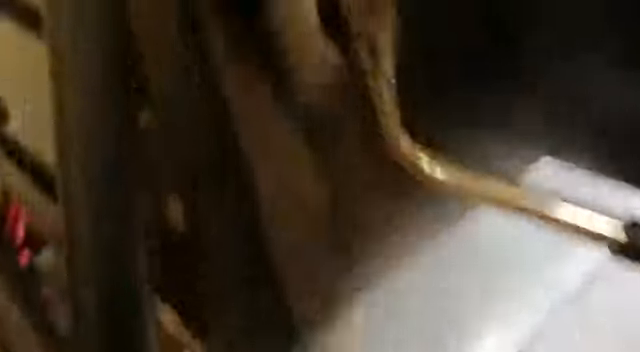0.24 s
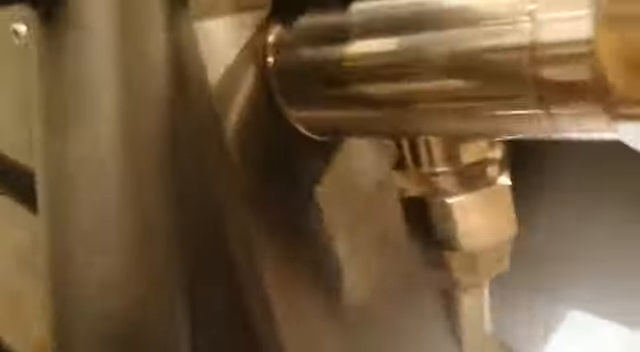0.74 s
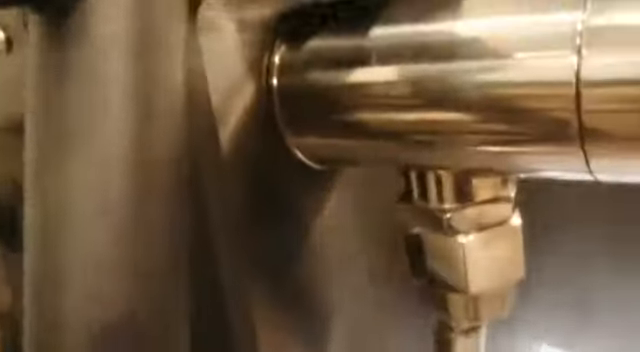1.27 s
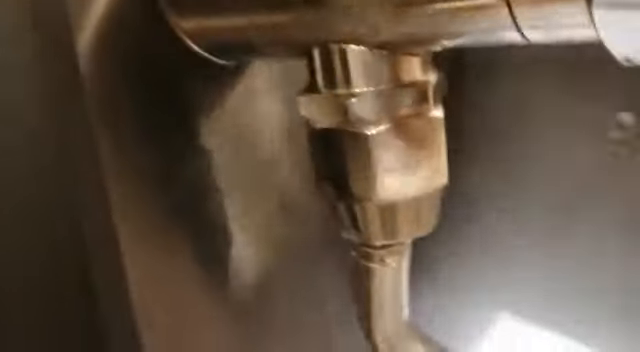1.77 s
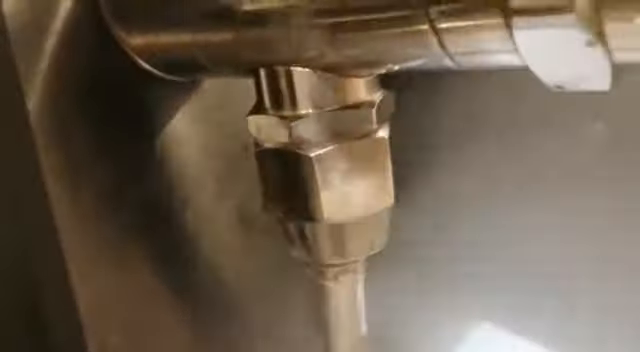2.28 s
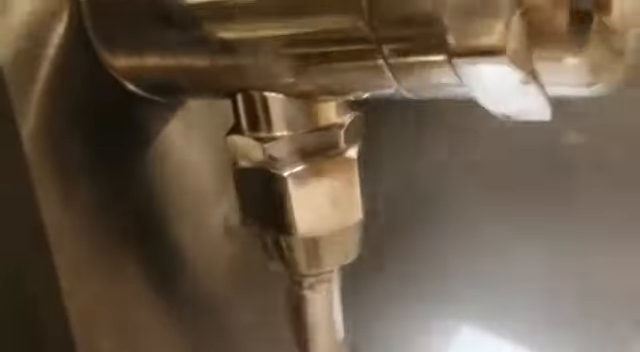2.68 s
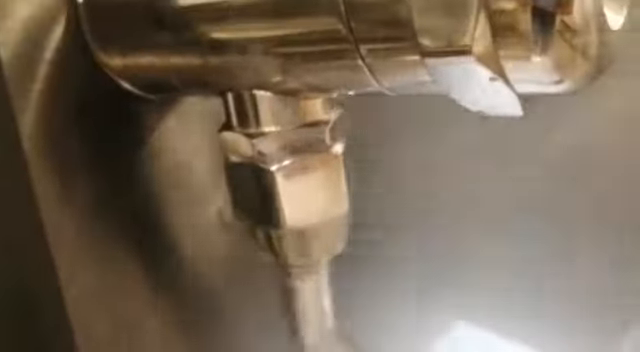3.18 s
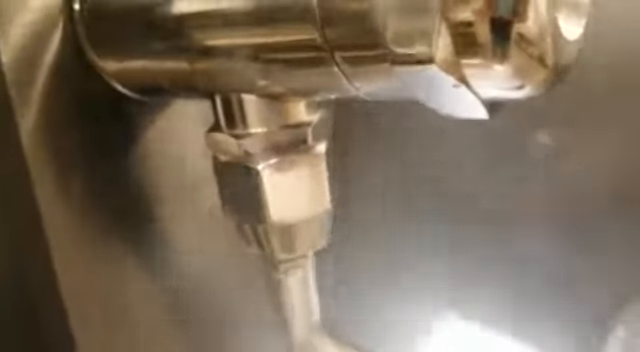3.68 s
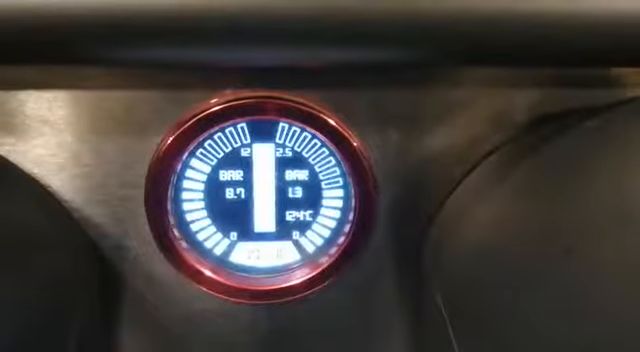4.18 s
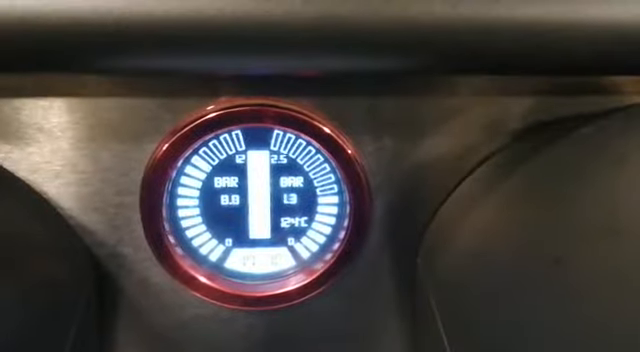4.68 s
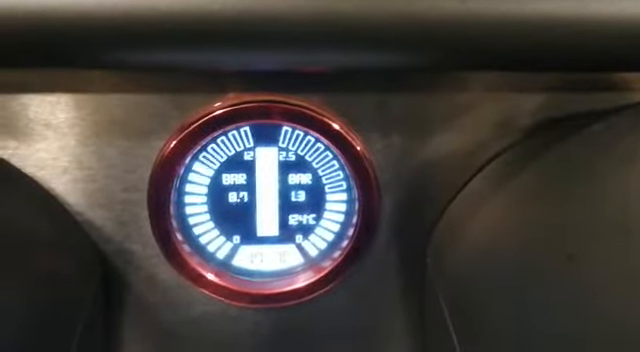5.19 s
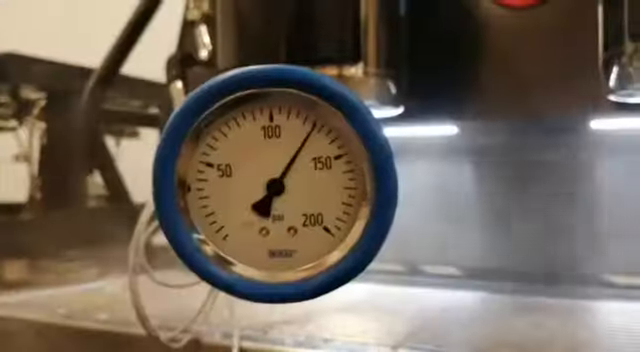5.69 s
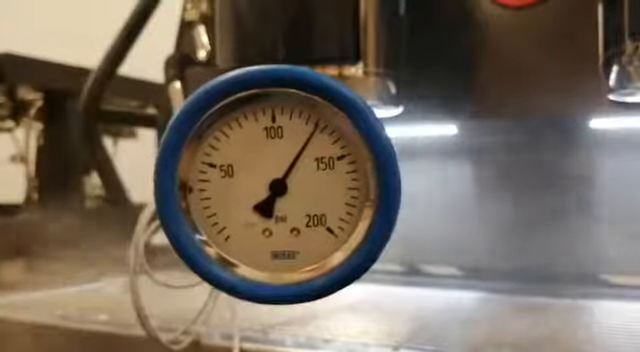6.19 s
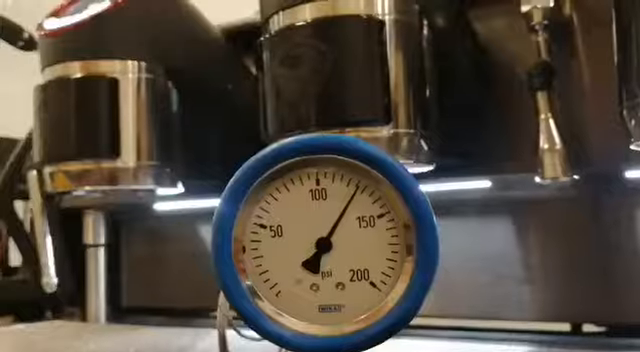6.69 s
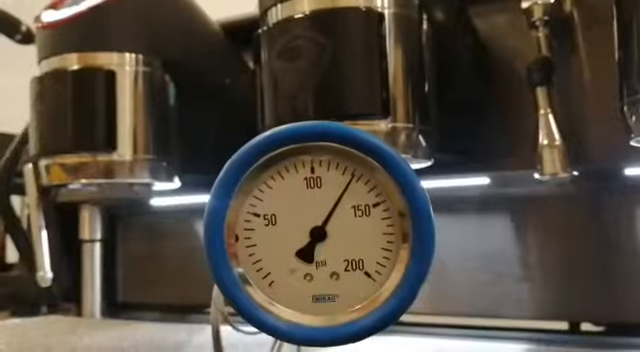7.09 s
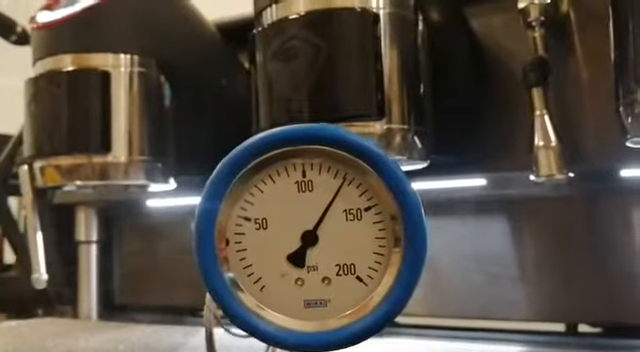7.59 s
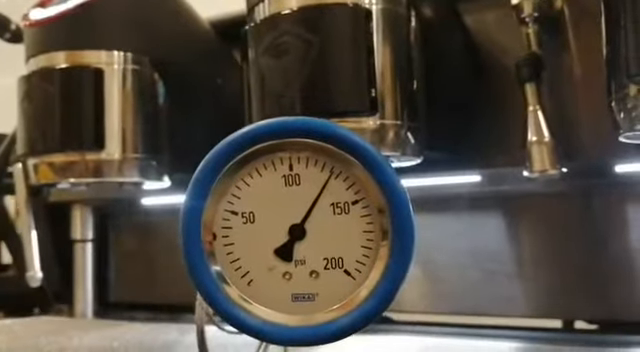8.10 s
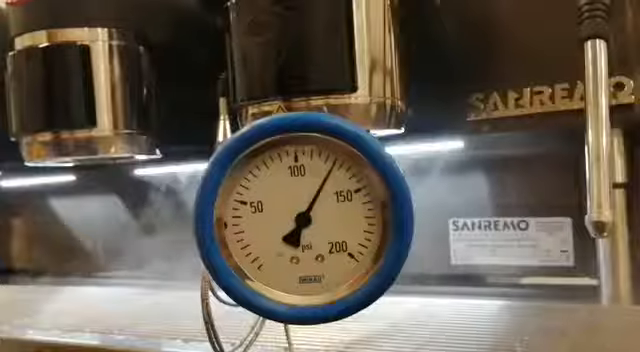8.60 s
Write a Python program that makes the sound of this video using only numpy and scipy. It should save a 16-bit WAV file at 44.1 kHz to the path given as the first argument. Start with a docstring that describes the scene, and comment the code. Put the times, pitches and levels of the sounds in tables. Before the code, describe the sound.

A close, bright hiss from an espresso machine's steam wand starts at once, swirling and spitting tiny droplets. It is loud at first, settles over the next couple of seconds and swells slightly around 3.5 seconds. At 3.9 seconds the perspective jumps: the hiss comes in quick, uneven spurts, and the pump's low hum and rumble join in. At 5.2 seconds the hiss steadies with a new tone, and at 6.4 it sounds a step farther away, gradually dulling. Soft, low bumps occur near the start and around 4, 5 and 7 seconds. Cups, saucers and a spoon clatter three times, at about 7, 7.6 and 8.1 seconds, toward the right across a hard, echoing room. At about 8.4 seconds everything drops out for an instant, then the closer hiss and hum return until the end.

```python
"""Steam hisses from the wand of an espresso machine: a swirling jet that spits tiny droplets.
We hear it at the wand, then at the control panel (where the hiss spurts and the pump's hum joins in),
then by the pressure gauge and a step back from it. Soft, low bumps come now and then.
Late on, cups, saucers and a spoon clatter three times across a hard, echoing room.
Near the end all sound drops out for a moment."""
import sys
import numpy as np
from scipy import signal
from scipy.fft import rfft, irfft, next_fast_len
from scipy.io import wavfile
from scipy.ndimage import uniform_filter1d

SR = 44100
rng = np.random.default_rng(int(sys.argv[2]) if len(sys.argv) > 2 else 0)


def log_audio(samples):
    """Write samples as a 16-bit WAV file to the path given in sys.argv[1]."""
    # one column per channel
    frames = np.atleast_2d(samples).T
    # limit to full scale, then quantise
    limited = np.clip(frames, -1, 1)
    pcm = np.round(limited * 32767).astype(np.int16)
    wavfile.write(sys.argv[1], SR, pcm)


N = 390285
TIME = np.arange(N) / SR
AT_PANEL_S, AT_GAUGE_S, STEP_BACK_S = 3.926, 5.174, 6.42  # the listener jumps to a new place
DROP_OUT_S, RETURN_S, PAST_END_S = 8.359, 8.479, 10
PANEL_RIGHT_DB, PANEL_FALL_DB_PER_S = -1.1, 6  # the hiss at the panel: starting offset and fade


def amp(db):
    """Turns decibels into a number to multiply a sound by."""
    return 10 ** (np.asarray(db) / 20)


def evened(x):
    """Scales a signal so that its typical size (rms) is one."""
    return x / np.sqrt(np.mean(x ** 2) + 1e-20)


def at_pitch(table, hz):
    """Looks up each column of a table at the given frequencies."""
    row_hz, *columns = np.transpose(table)
    return np.array([np.interp(np.log(hz + 1), np.log(row_hz + 1), c) for c in columns])


def at_time(table, t):
    """Looks up a two-column table at the given times."""
    return np.interp(t, *np.transpose(table))


def between(start, end, edge_s=0.002):
    """One from start to end and zero outside, joined by ramps."""
    return np.clip(np.minimum(TIME - start, end - TIME) / edge_s + .5, 0, 1)


def eased(t, at_s, span_s):
    """A smooth step from zero to one."""
    return .5 + .5 * np.tanh((t - at_s) / (2 * span_s))


def bell(x, centre, width, db):
    """A lift in dB at the centre, falling away on both sides."""
    return db * np.exp(-((x - centre) / width) ** 2)


def wander(per_s):
    """A random drift of typical size one, with per_s new values a second."""
    times = np.arange(0, PAST_END_S, 1 / per_s)
    return evened(np.interp(TIME, times, rng.standard_normal(4000)[:len(times)]))


def add(mix, start_s, sound):
    """Adds a sound to the mix at the given time."""
    part = mix[max(round(start_s * SR), 0):][:len(sound)]
    part += sound[:len(part)]


def coloured(x, spectrum):
    """Turns frequencies up or down, following rows of pitch_hz, gain_db."""
    size = next_fast_len(x.shape[-1] + 4096)
    gain = amp(at_pitch(spectrum, np.fft.rfftfreq(size, 1 / SR))[0])
    return irfft(rfft(x, size) * gain, size)[..., :x.shape[-1]]


def noise_pair(likeness, size=N):
    """White noise for two ears: unrelated at likeness 0, the same at 1."""
    left, other = rng.standard_normal((2, size)) * np.sqrt(SR / 2)
    return np.array([left, likeness * left + np.sqrt(1 - likeness ** 2) * other])


def jet(start, end, colour, change, likeness, patchy_db, flicker_db):
    """Rushing steam: noise shaped by colour and change(t, hz), with swirls lifting random patches."""
    first, last = max(int(start * SR) - 1024, 0), min(int(end * SR) + 1024, N)
    hz, t, slices = signal.stft(noise_pair(likeness, last - first), SR, nperseg=512, noverlap=384)
    t, hz = t + first / SR, hz[:, None]
    level_db = at_pitch(colour, hz) + change(t - start, hz)
    swirls = uniform_filter1d(rng.standard_normal(slices.shape[1:]), size=4, axis=0)
    swirls = uniform_filter1d(swirls, size=12, axis=1)
    flicker = uniform_filter1d(rng.standard_normal(len(t)), size=4)
    level_db += patchy_db * evened(swirls) + flicker_db * evened(flicker)
    slices = slices * amp(level_db) * hz ** 2 / (hz ** 2 + 230 ** 2)  # a small jet makes little bass
    hiss = np.zeros((2, N))
    hiss[:, first:last] = signal.istft(slices, nperseg=512, noverlap=384)[1][:, :last - first]
    return hiss * between(start, end)


def near_echoes(x, echo_db, count=14):
    """Quick echoes off the machine and counter put fine ripples in the tone of the hiss."""
    echoes = np.zeros((2, SR // 50))
    delays = rng.integers(SR // 400, echoes.shape[1], (2, count))
    strengths = rng.choice([-1., 1.], delays.shape) * amp(echo_db) / np.sqrt(count)
    np.put_along_axis(echoes, delays, strengths, axis=1)
    echoes[:, 0] = 1  # the direct sound
    return signal.oaconvolve(x, echoes / np.linalg.norm(echoes[0]), axes=1)[:, :N]


def steel_echo_db(t, hz):
    """An echo off the steel beside the wand strengthens some pitches and weakens others."""
    # how late the echo comes: time_s, lag_ms
    echo_lag = [(0.05, .295), (.18, .225), (.26, .255), (.42, .45), (.57, .505), (.68, .395), (.92, .305)]
    lag_s = at_time(echo_lag, t) / 1000
    nearness = np.exp(-abs(t - .28) / .6)  # closest to the steel at 0.28 s
    echo = .7 * nearness
    ripple = abs(1 + echo * np.exp(2j * np.pi * hz * lag_s)) / np.sqrt(1 + echo ** 2)
    return 20 * np.log10(ripple) + nearness * bell(hz, centre=9160, width=740, db=3.6)


def valve_hollow_db(t, hz, from_hz=2760, to_hz=3290, passed_s=0.95):
    """The hollow under the valve sings higher as the listener nears it, and loudest in passing."""
    pitch_hz = from_hz + (to_hz - from_hz) * eased(t, passed_s, span_s=.04)
    lift_db = 3.5 + bell(t, passed_s, width=.42, db=5)
    return bell(hz, pitch_hz, width=250, db=lift_db)


def passing_wand_db(t, hz):
    """How the hiss changes in each ear: loud at first, it settles as the listener leaves its path."""
    # lasting peaks and a dip in the left ear: pitch_hz, width_hz, lift_db
    left_peaks = [(7060, 280, 2), (7760, 340, -3), (10140, 600, 2.5)]
    # high treble in the right ear: time_s, lift_db
    right_treble = [(0.3, -5), (.47, -4), (1.0, 6.5), (2.3, -0.5), (3.3, 0), (3.45, 6), (3.9, 2)]
    settling = np.exp(-t)
    swell = eased(t, 3.43, span_s=0.022) * (1 - eased(t, 3.69, span_s=0.033))
    both_db = -0.69 + swell * (1.25 + bell(hz, centre=15000, width=610, db=5.5))
    left_db = 4.5 * settling + steel_echo_db(t, hz) + sum(bell(hz, *peak) for peak in left_peaks)
    clear = eased(t, 0.14, span_s=0.16)  # at first the machine hides the middle pitches on the right
    hidden_db = bell(hz, centre=2750, width=800, db=-18)
    right_db = 4 * settling + (1 - clear) * hidden_db + clear * valve_hollow_db(t, hz)
    right_db += bell(hz, centre=9100, width=1700, db=at_time(right_treble, t))
    return both_db + np.array([left_db, right_db])


def steam_at_wand():
    """The jet heard close up while the listener moves past it."""
    # tone of the hiss: pitch_hz, left_db, right_db
    colour = [(406, -107.5, -87.5), (786, -86.5, -85), (1800, -90.5, -86.5), (2200, -91, -76.5),
              (3330, -82.5, -78), (4000, -90.5, -82.5), (5000, -84.5, -76), (5730, -83.5, -68),
              (7250, -79, -74), (7620, -78.5, -83), (10260, -73, -86), (10600, -78, -81.5),
              (14240, -78.5, -74), (14900.0, -79.5, -65), (15660, -89, -80.5)]
    hiss = jet(0, AT_PANEL_S, colour, passing_wand_db, likeness=0.2, patchy_db=1.0, flicker_db=0.79)
    return near_echoes(hiss, echo_db=-14.5)


def spitting(per_s=61, spread_db=5.0, burst_db=-14.5, fade_s=0.00076):
    """Droplets torn through the nozzle each turn the hiss up for about a millisecond."""
    drops = (rng.random(N) < per_s / SR) * amp(spread_db * np.minimum(rng.exponential(1, N), 3))
    bursts = signal.lfilter([1], [1, -np.exp(-1 / (fade_s * SR))], drops)
    return 1 + amp(burst_db) * bursts


def low_bumps():
    """Soft, dull, low thuds and brief swells of rumble."""
    # soft bumps: start_s, length_s, pitch_hz, level_db
    bumps = [(0, 0.065, 196, -48), (.04, 0.17, 167, -58.5), (.5, 0.17, 200, -62), (.72, 0.36, 35, -65),
             (1.065, 0.03, 380, -55), (3.921, .07, 231, -43), (4.95, 0.14, 76, -40), (4.96, 0.13, 182, -44),
             (5.105, 0.048, 109, -39), (7.02, 0.39, 32, -46), (7.149, 0.56, 78, -49)]
    thuds = np.zeros(N)
    for start_s, length_s, hz, db in bumps:
        band = signal.butter(3, [hz / 1.4, hz * 1.4], "band", fs=SR, output="sos")
        thud = signal.sosfilt(band, rng.standard_normal(SR))[-int(length_s * SR):]
        add(thuds, start_s, amp(db) * evened(thud * np.hanning(len(thud))))
    return thuds * amp([[-4], [0]])  # softer on the left


def room_tone():
    """The faint, low, steady noise of the room."""
    # tone of the room: pitch_hz, level_db
    colour = [(15, -100), (60, -91), (130, -88.5), (220, -90), (400, -99), (1000, -110)]
    return coloured(noise_pair(likeness=0.51), colour)


def standing(left_db, right_db, fall_db_per_s, bright, dulling, hollows=()):
    """Heard from one spot, the jet fades and dulls; bright is dB per octave, dulling its loss a second."""
    def change(t, hz):
        octaves = np.log2(np.maximum(hz, 1000) / 6000)
        singing_db = sum(bell(hz, *hollow) for hollow in hollows)
        both_db = (bright - dulling * t) * octaves - fall_db_per_s * t + singing_db
        return np.array([left_db + both_db, right_db + both_db])
    return change


def spurting(flutter_db=1.5):
    """Each spurt of steam turns the hiss up quickly and lets go more slowly."""
    # spurts at the panel: start_s, end_s, level_db
    spurts = [(3.942, 3.975, 5), (3.999, 4.263, 6), (4.274, 4.339, 2), (4.405, 4.422, 5.5),
              (4.43, 4.542, 2.5), (4.539, 4.615, 5.5), (4.655, 4.706, 0), (4.77, 4.776, 2),
              (4.851, 4.862, 0.5), (4.949, 4.998, 1.5), (5.021, 5.099, -0.5), (5.104, 5.141, 2.7)]
    resting_db = PANEL_RIGHT_DB - PANEL_FALL_DB_PER_S * (TIME - AT_PANEL_S)
    lift_db = np.zeros(N)
    for start_s, end_s, db in spurts:
        shape = between(start_s, PAST_END_S, edge_s=.003) * between(0, end_s, edge_s=.014)
        lift_db = np.maximum(lift_db, shape * (db - resting_db))
    return amp(lift_db + flutter_db * wander(90))


def steam_at_panel():
    """The jet from the control panel: the high hiss spurts over a smooth, low rush."""
    # tone of the hiss: pitch_hz, left_db, right_db
    colour = [(580, -69.5, -68.5), (1860, -88.5, -79.5), (2800, -90, -74.5), (3340, -84, -71),
              (3690, -101, -91), (4500, -90, -76), (5970, -79.5, -71.5), (7470, -83, -78),
              (7860, -86, -94.5), (8570, -75.5, -76), (10600, -77.5, -89), (13900.0, -87.5, -79.5),
              (15100, -81.0, -81), (15700.0, -79, -80)]
    change = standing(-1.4, PANEL_RIGHT_DB, PANEL_FALL_DB_PER_S, bright=0, dulling=0.16)
    hiss = jet(AT_PANEL_S, AT_GAUGE_S, colour, change, likeness=0.061, patchy_db=1.4, flicker_db=-0.5)
    hiss = near_echoes(hiss, echo_db=-15.5)
    rush = coloured(hiss, [(700, 0.5), (1400, -4.5), (2500, -10), (5000, -44)])
    return (hiss - rush) * spurting() + amp(-1.5) * rush


def pump(pump_hz=110, mains_hz=120, ring_fall_db_per_s=6.5, hum_fall_db_per_s=4):
    """Forced water rumbles, pump and mains hum, and the front panel rings at three times pump_hz."""
    # the pump's tones: multiple of pump_hz, level_db
    overtones = [(2, -51.5), (4, -67.5), (5, -62), (6, -81), (7, -63.5), (8, -66.5), (9, -78)]
    # tone of the rumble: pitch_hz, level_db
    rumble_colour = [(15, -71), (35, -75), (65, -64.5), (110, -62.5), (190, -66.5), (260, -71),
                     (380, -85.5), (600, -92.5), (1200, -110)]
    # at the panel, at the gauge, a step back and after the drop-out: rumble_db, hum_db, ring_db
    place_levels = [(0.3, 5, -40.5), (0.5, 0.5, -54.5), (-.5, 0.5, -53), (1.5, 5, -51)]
    place = np.searchsorted([AT_GAUGE_S, STEP_BACK_S, RETURN_S], TIME)
    rumble_db, hum_db, ring_db = uniform_filter1d(np.array(place_levels, float)[place].T, 900, axis=1)
    stood_s = (TIME - AT_PANEL_S) * between(AT_PANEL_S, AT_GAUGE_S, edge_s=0.022)  # time at the panel
    dip_db = -6 * between(7.7, 8.42, edge_s=0.16)
    phase = 2 * np.pi * np.cumsum(pump_hz * (1 + 0.00197 * wander(9))) / SR
    hum = sum(amp(db + 1.26 * wander(12)) * np.sin(multiple * phase) for multiple, db in overtones)
    hum += amp(-50.5 + 1.9 * wander(8.6)) * np.sin(2 * np.pi * mains_hz * TIME)
    hum *= amp(hum_db + dip_db - hum_fall_db_per_s * stood_s)
    ring = amp(ring_db - ring_fall_db_per_s * stood_s + 1.2 * wander(10)) * np.sin(3 * phase)
    rumble = coloured(noise_pair(likeness=0.98), rumble_colour) * amp(rumble_db + dip_db + wander(17))
    left_db = -4.5 - 7.3 * between(AT_GAUGE_S, RETURN_S)
    ears = np.array([amp(left_db), np.ones(N)])
    return (np.sqrt(2) * (hum + ring) + rumble) * ears * between(AT_PANEL_S, PAST_END_S)


def steam_at_gauge():
    """The jet from the pressure gauge, from a step back, then from the gauge again."""
    # tone of the hiss at the gauge and a step back: pitch_hz, left_db, right_db
    near_colour = [(600, -83, -73.5), (1800, -91.5, -80.0), (2730, -90, -72.5), (3350, -85, -74.5),
                   (3630, -93, -83), (4380, -91, -80), (5260, -84, -66.5), (6160, -88, -67.5),
                   (8000, -90, -82.5), (9440, -76, -78.5), (10550, -87, -80.5), (12800.0, -88.5, -83),
                   (15000.0, -90, -72), (15700.0, -103.0, -76)]
    far_colour = [(550.0, -89.5, -76), (780.0, -85.5, -76.5), (1600, -102, -86.5), (1980, -95, -78),
                  (3160, -96, -80.5), (3980, -101.0, -91), (5200, -94, -75.5), (5980, -94.5, -73.5),
                  (7830, -94.0, -86), (9200, -85, -89), (10200.0, -92, -86.5), (14000, -96.5, -82.5),
                  (15300, -97, -71), (15500, -101.0, -86)]
    # peaks and dips from the machine's hollows at those places: pitch_hz, width_hz, lift_db
    near_hollows = [(2700, 120, 5), (5230, 76, 7), (5960, 90, -1.5), (2500, 110, -3.5), (5280, 96, -9.5)]
    far_hollows = [(1880, 95, 6.4), (2200, 31, 1.3), (5840, 100, 4), (7100, 160, 4.5), (13600, 130, 4)]
    near = standing(3.1, 2.1, fall_db_per_s=1.95, bright=.15, dulling=0.23, hollows=near_hollows)
    far = standing(1.9, 3.5, fall_db_per_s=2.14, bright=0.43, dulling=0.67, hollows=far_hollows)
    near_again = standing(5.5, 2.4, fall_db_per_s=1, bright=0.48, dulling=.1)
    places = [(AT_GAUGE_S, STEP_BACK_S, near_colour, near),
              (STEP_BACK_S, RETURN_S, far_colour, far),
              (RETURN_S, PAST_END_S, near_colour, near_again)]
    hiss = sum(jet(*place, likeness=0.1, patchy_db=1.38, flicker_db=0.68) for place in places)
    return near_echoes(hiss, echo_db=-7.5)


def ringing(tones, t, rocking=0.6):
    """A struck piece rings with fading tones that waver as it rocks; their total energy is one."""
    ring = np.zeros(len(t))
    for hz, db, fade_s in tones:
        real, imag = uniform_filter1d(rng.standard_normal((2, len(t))), size=500, axis=1)
        waver = np.exp(2j * np.pi * rng.random()) + rocking * evened(real + 1j * imag)
        fade = amp(db - 60 * t / fade_s) / np.sqrt(fade_s)
        ring += fade * (waver * np.exp(2j * np.pi * hz * t)).real
    return ring / np.linalg.norm(ring)


def room_echo(x):
    """Hard walls give each ear a dense tail of echoes; the treble dies first."""
    # how long the room takes to fade by 60 dB: pitch_hz, fade_s
    fade_times = [(200, 0.68), (2500, 0.92), (6000, 0.59), (14000, 0.62)]
    hz, t, slices = signal.stft(rng.standard_normal((2, SR)), SR, nperseg=256)
    tail = signal.istft(slices * amp(-60 * t / at_pitch(fade_times, hz[:, None])), SR, nperseg=256)[1]
    return signal.fftconvolve(x[None], tail / np.linalg.norm(tail[0]), axes=1)[:, :N]


def crockery(gain_db=13, direct_db=-10, clack_fade_s=0.047, clack_rise_s=0.0063):
    """Dishes knock on a far counter: each knock is a clack and a ring, heard mostly as room echo."""
    # the knocks: start_s, clack_db, cup_db, saucer_db, spoon_db, counter_db
    knocks = [(6.965, -9.5, -43, -32, -36, -32), (6.992, -3.5, -40, -35, -40, -19.5),
              (7.056, -1.5, -32, -24, -40, -22.5), (7.626, -5.5, -1.5, -19, -23.5, -15),
              (7.716, -29, -10, -24, -14, -20), (7.775, -26, -16, -29, -22.5, -43),
              (8.11, -28, -10, -27, -29, -40), (8.134, -6, -10, -3.5, -17.5, -32),
              (8.195, -10, -22, -11.5, -15, -23.5)]
    # the tones each thing rings with: pitch_hz, share_db, fade_s (time to fall 60 dB)
    cup = [(2000, -23, .3), (3799, -11, 0.26), (5225, -3.5, 0.17), (5600, -7.5, .1), (6100, 0, .3),
           (6200, -1, 0.079), (6610, 2, 1), (8580, -14.5, 0.14)]
    saucer = [(1250, -8.5, 0.8), (2370, -7, .4), (2796, -11, .25), (3554, -13, .4), (4240, -8.5, 0.16),
              (5230, -5, .25), (5660, -3, 0.14), (5960, -1, 0.18), (6040, 3.5, 0.064), (6570, 0, .15),
              (13000, -14.5, .3)]
    spoon = [(3799, -10, 0.2), (9484, -3.5, 0.42), (13160, -9, 0.18), (13700, -13, .2)]
    counter = [(479, -0.5, 0.088), (551, 4, 0.093), (686, -1, 0.036), (760, 10, 0.045), (948, 0, 0.18)]
    # tone of a clack, and how the left ear is shaded from the dishes: pitch_hz, gain_db
    clack_colour = [(100, -28), (400, -10.5), (750, -15.5), (1400, -7.5), (1900, -5.5), (2450, 0.5),
                    (3200, -0.5), (4000, -11), (5300, -4.5), (6500, -5.5), (8000, -16.5), (10000, -23),
                    (15000, -23)]
    left_shade = [(300, -7), (2500, -13.5), (6000, -13.5), (8000, -14), (9500, 4.5), (12000, -10)]
    pieces = (cup, saucer, spoon, counter)
    t = np.arange(SR // 3) / SR
    clacks, rings = np.zeros((2, N))
    for start_s, clack_db, *ring_db in knocks:
        shape = amp(-60 * t / clack_fade_s) * (1 - np.exp(-t / clack_rise_s))
        clack = rng.standard_normal(len(t)) * shape
        add(clacks, start_s, amp(clack_db) * clack / np.linalg.norm(clack))
        add(rings, start_s, sum(amp(db) * ringing(tones, t) for db, tones in zip(ring_db, pieces)))
    direct = amp(5.5) * coloured(clacks, clack_colour) + rings
    left, right = amp(gain_db) * (room_echo(direct) + amp(direct_db) * direct)
    return np.array([coloured(left, left_shade), right])


def scene():
    """Steam, pump, crockery and low bumps over the quiet room."""
    steam = steam_at_wand() + steam_at_panel() + steam_at_gauge()
    steam = steam * spitting() * amp(0.23 * wander(7))  # the pressure wavers slightly
    return steam + pump() + crockery() + low_bumps() + room_tone()


def record(dry, top_hz=15780):
    """The sound drops out briefly and comes back in two steps; treble above top_hz is cut."""
    drop_db = -70 * between(0, RETURN_S, edge_s=.0005) * np.clip((TIME - DROP_OUT_S) / .025, 0, 1)
    recovering_db = -4.5 * between(RETURN_S, 8.515)
    treble_cut = signal.firwin(511, top_hz, window=("kaiser", 9), fs=SR)
    return signal.oaconvolve(dry * amp(drop_db + recovering_db), treble_cut[None], "same")


dry = scene()
out = record(dry)
log_audio(out)
```